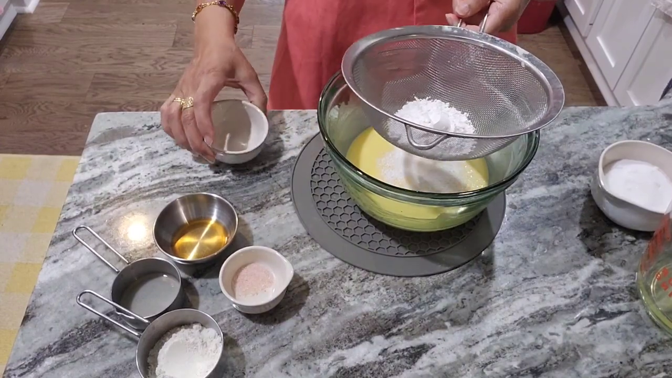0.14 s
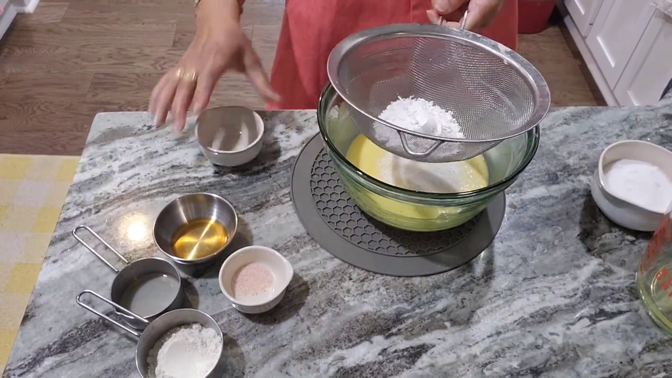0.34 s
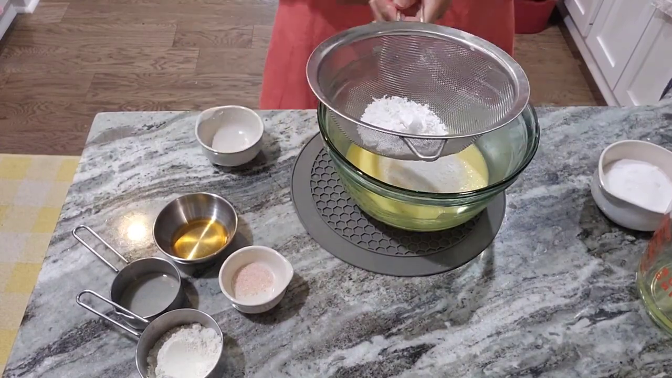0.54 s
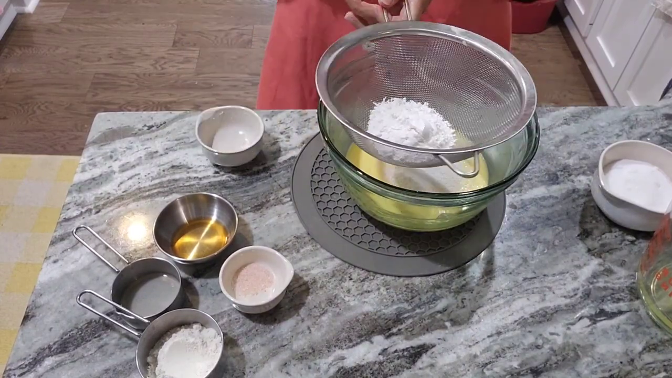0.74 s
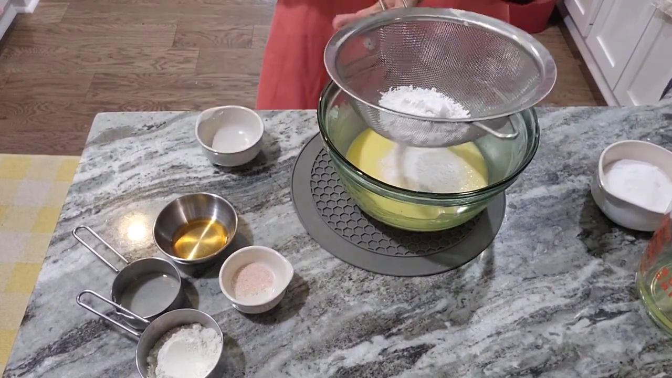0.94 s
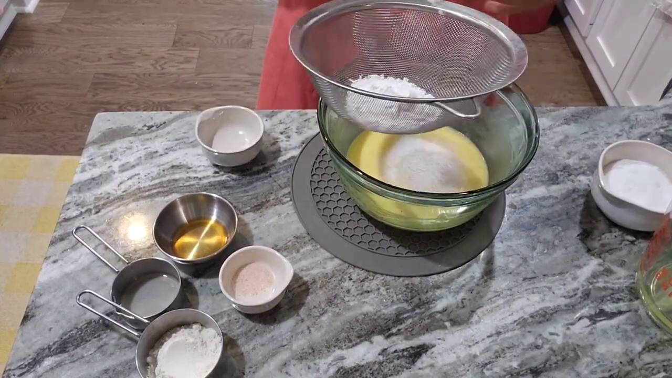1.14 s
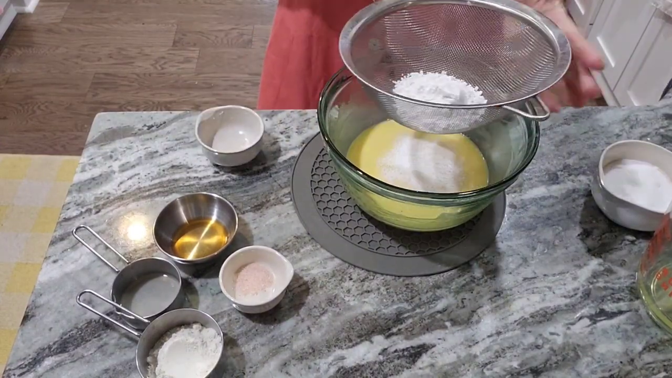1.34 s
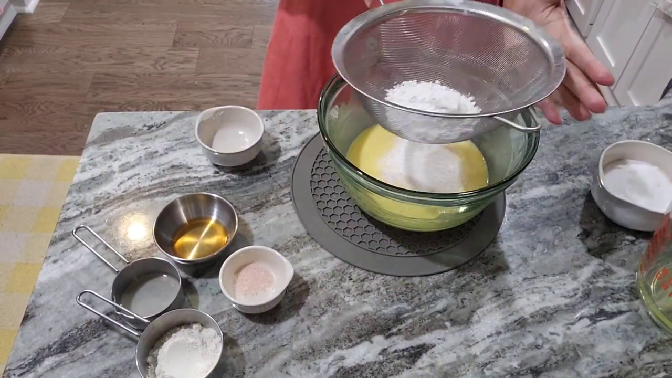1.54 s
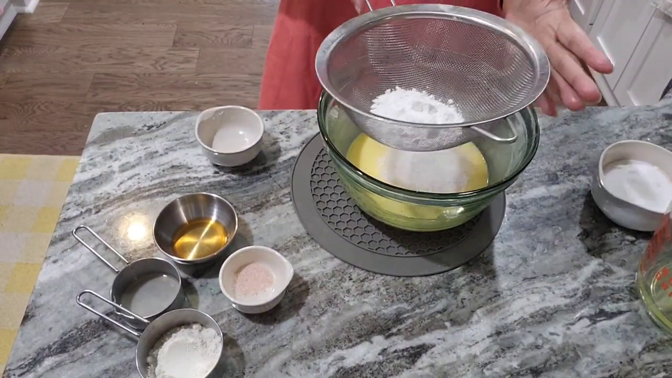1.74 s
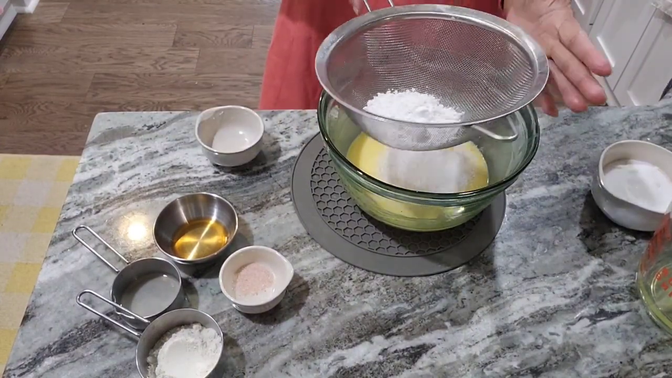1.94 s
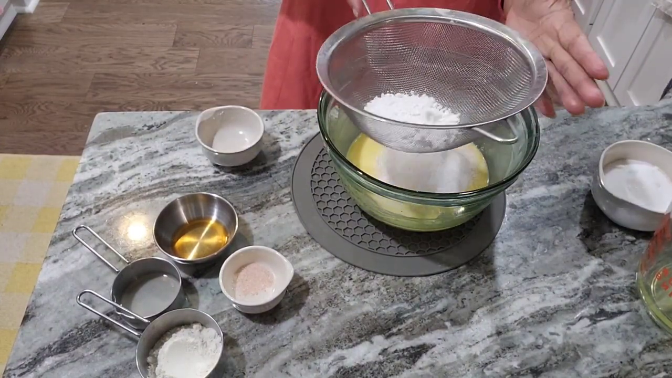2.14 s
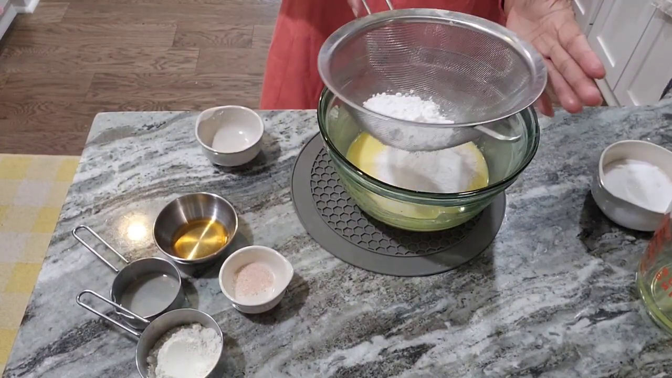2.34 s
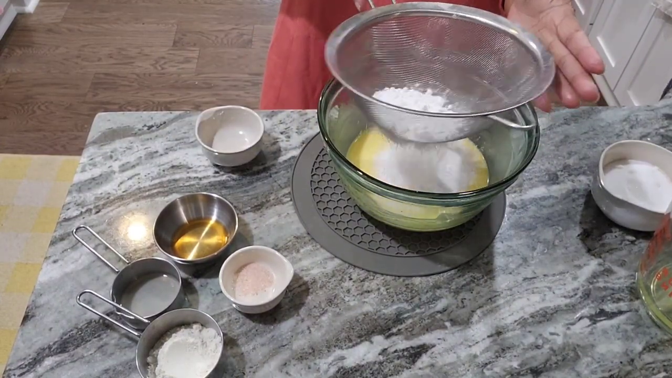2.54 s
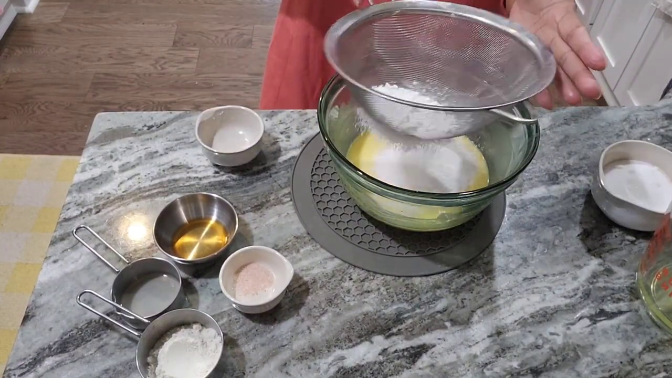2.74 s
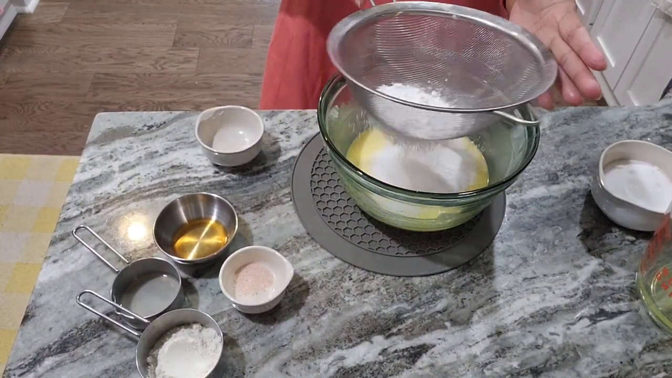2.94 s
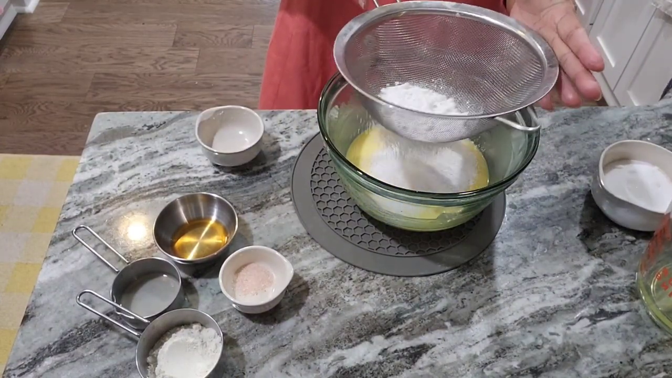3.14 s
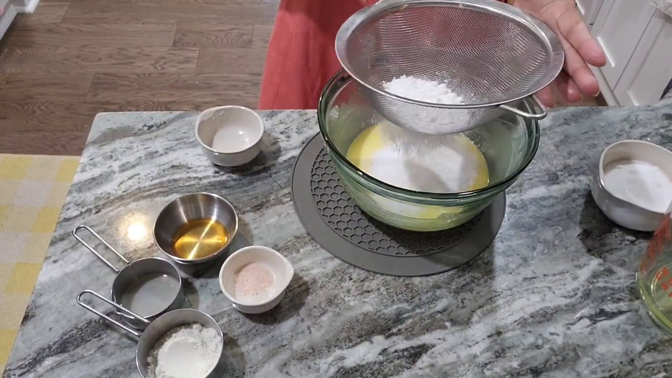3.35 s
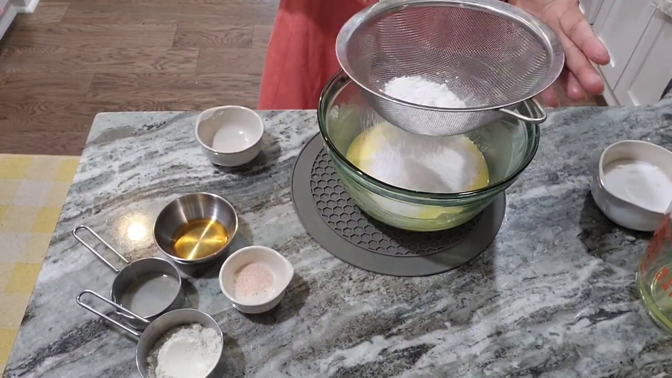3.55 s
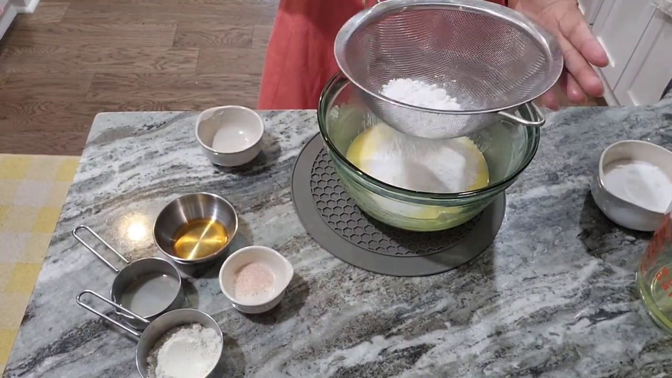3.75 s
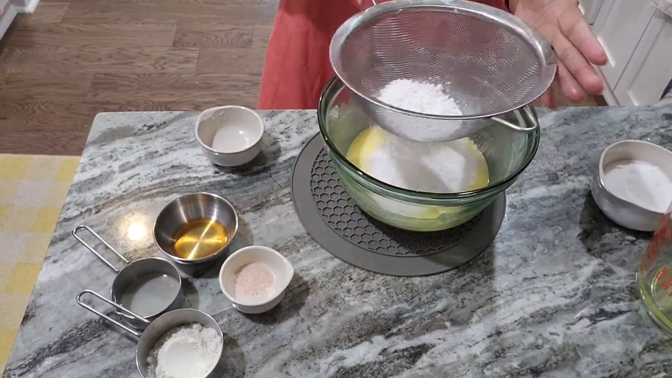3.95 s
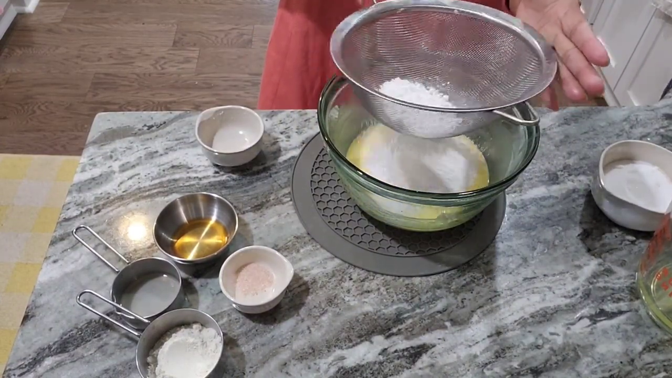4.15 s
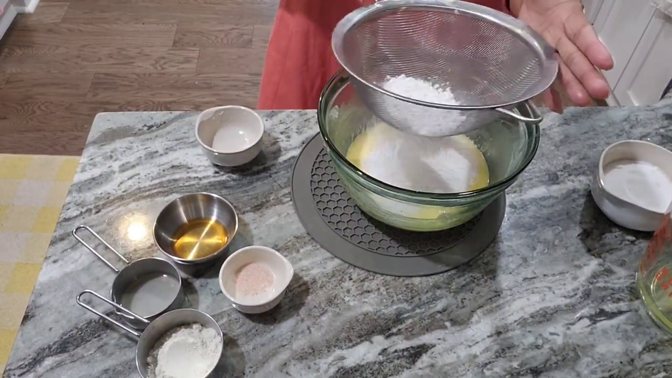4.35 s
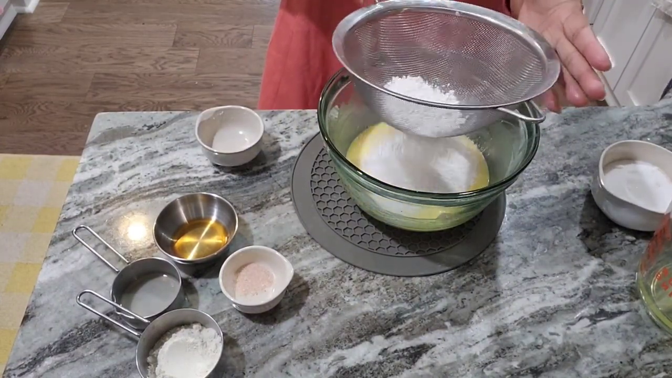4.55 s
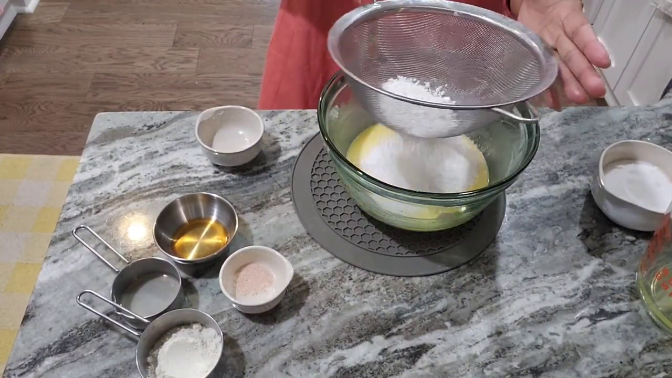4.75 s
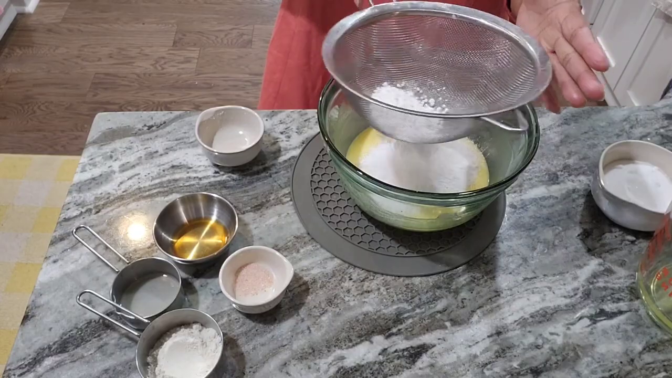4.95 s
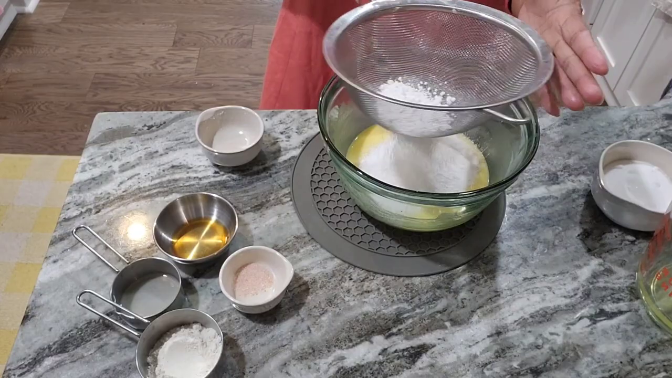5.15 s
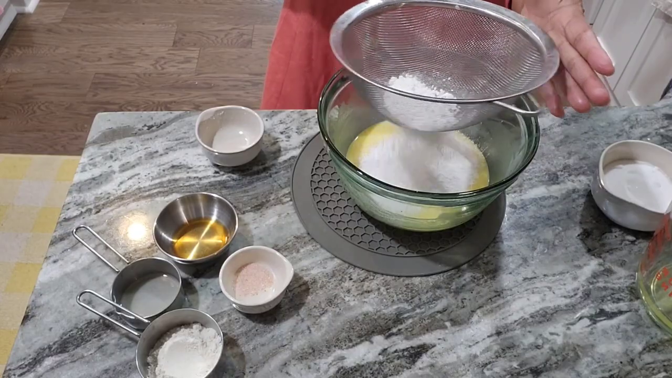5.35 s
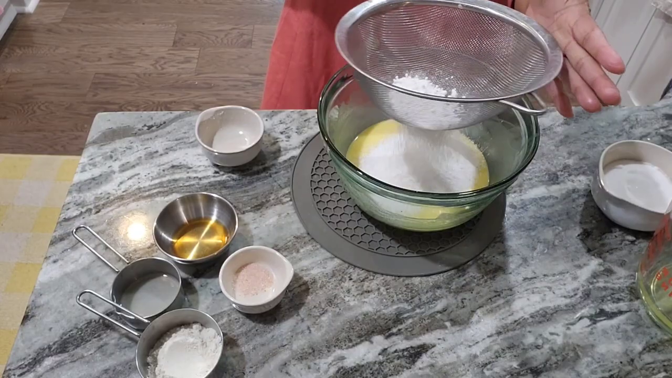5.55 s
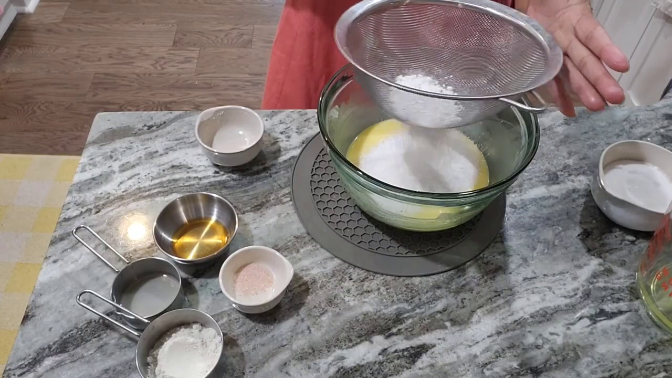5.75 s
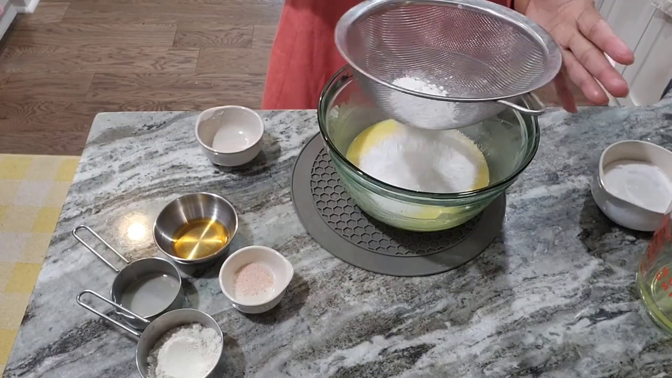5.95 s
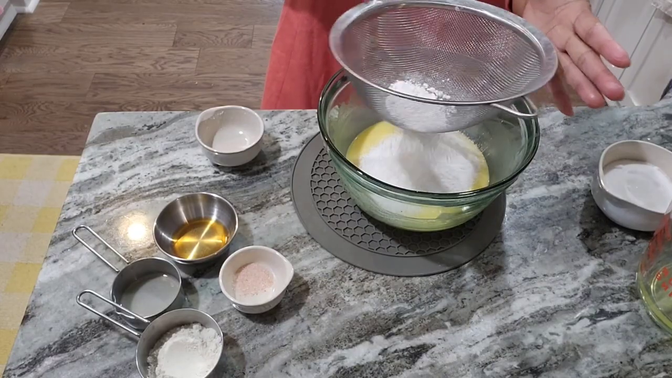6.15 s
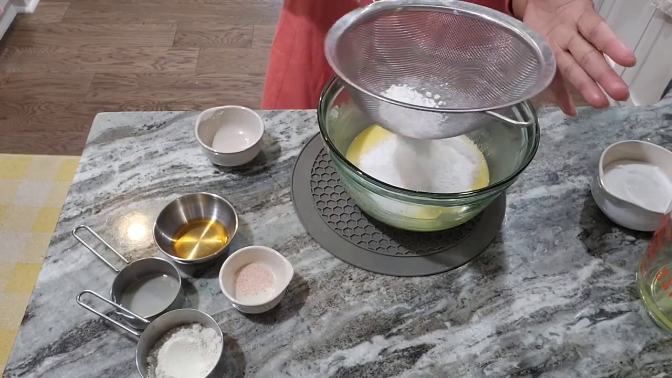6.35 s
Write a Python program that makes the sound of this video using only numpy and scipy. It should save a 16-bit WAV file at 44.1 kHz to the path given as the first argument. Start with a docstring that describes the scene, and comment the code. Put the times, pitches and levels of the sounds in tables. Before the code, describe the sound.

A small ceramic dish is set down on a stone counter close to the microphone, with one knock and then a quick ringing rattle. Afterwards, slightly to the right, flour hisses very faintly through a wire sieve patted about five times a second, with a few tiny ticks of the mesh. An appliance hums low throughout, and a barely audible high chirr recurs across the kitchen.

```python
"""A small ceramic dish is put down on a stone kitchen counter, close to a stereo microphone:
one held knock, then it is let go, rattles and rings. Just to the right, flour hisses faintly through
a wire sieve patted about five times a second, and the mesh ticks. An appliance hums low throughout,
a faint high chirr comes from across the room, and the kitchen rings for about half a second."""
import sys
import numpy as np
from scipy import signal
from scipy.fft import rfft, irfft
from scipy.io import wavfile

SR = 44100
rng = np.random.default_rng(int(sys.argv[2]) if len(sys.argv) > 2 else 0)


def store_wav(level_fs):
    """Save 16-bit WAV to argv[1]."""
    pcm = np.round(np.clip(np.atleast_2d(level_fs), -1, 1) * 32767)
    wavfile.write(sys.argv[1], SR, pcm.T.astype(np.int16))


N = 282240
TIME = np.arange(N) / SR
FREQ = np.maximum(np.fft.rfftfreq(N, 1 / SR), 1)


def undb(db):
    """Decibels to gain."""
    return 10 ** (np.asarray(db) / 20)


def along(table, hz=FREQ):
    """Read (f/Hz, value) points on a log-frequency axis."""
    f, value = np.transpose(table)
    return np.interp(np.log(hz), np.log(f), value)


def unit(x):
    """Scale to rms 1."""
    return x / np.sqrt(np.mean(x ** 2))


def colour(x, table):
    """Filter by a spectrum of (f/Hz, level/dB) points."""
    return irfft(rfft(x) * undb(along(table)), N)


def walk(rate):
    """Smooth random drift of rms 1 that changes about rate times a second."""
    return unit(irfft(rfft(rng.standard_normal(N)) * np.exp(-(FREQ / rate) ** 2), N))


def causal(gain):
    """Spectrum of the most compact causal response with this gain per frequency."""
    cepstrum = irfft(np.log(gain + 1e-9), N)
    cepstrum[1:N // 2] *= 2
    cepstrum[N // 2 + 1:] = 0
    return np.exp(rfft(cepstrum))


def at_microphone(x, lag_ms):
    """Two microphone ports: the right hears x lag_ms later, or earlier if negative."""
    return np.array([x, irfft(rfft(x) * np.exp(-2j * np.pi * FREQ * lag_ms / 1000), N)])


# likeness of the room sound at the two ports: f/Hz, correlation
PORT_LIKENESS = [(60, 0.98), (150, 0.85), (350, 0.674), (700, 0.073), (1500, 0), (4000, 0.027)]
def diffuse_noise():
    """Noise from all sides: alike at both ports in the bass, unrelated in the treble."""
    likeness = along(PORT_LIKENESS)
    mid, side = rfft(rng.standard_normal((2, N))) * np.sqrt([(1 + likeness) / 2, (1 - likeness) / 2])
    return irfft([mid + side, mid - side], N)


# appliance hum in the room, with a trace of fan whine: f/Hz, level/dB
HUM_LINES = [(63.5, -57.5), (73, -65.5), (114.8, -56), (155.3, -57), (198.8, -61.5), (223, -67.5),
             (341, -79), (443, -78.5), (613, -77), (705, -79)]
# the hum sinks and swells a little: t/s, level/dB
HUM_SWELL = [(0.9, -2), (1.7, 1), (2.4, 1), (2.55, -4), (2.75, 1), (4.25, -1), (4.85, 2.5), (5.25, -.5),
             (6.35, -.5)]
# kitchen air all around the microphone: f/Hz, level/dB
AIR_SPECTRUM = [(20, -21), (35, -13), (58, 2.5), (90, -1.5), (128, 3.5), (180, -5), (250, -14),
                (450, -19.5), (680, -20.5), (1000, -28), (1500, -42.5), (2300, -49.5), (4500, -55.5),
                (13000, -54)]
def appliance(air_db=-48.5, waver_db=2, wander_rad=1.0):
    """Low hum lines that waver in level and phase, over a rush of air."""
    hum = 0
    for hz, db in HUM_LINES:
        amplitude = np.sqrt(2) * undb(db + waver_db * walk(6))
        hum = hum + amplitude * np.sin(2 * np.pi * hz * TIME + wander_rad * walk(4))
    air = unit(colour(diffuse_noise(), AIR_SPECTRUM))
    rumble = signal.sosfiltfilt(signal.butter(2, 250, fs=SR, output="sos"), air)
    rush = undb(air_db + 1.6 * walk(9.93)) * (air - rumble)
    swell = undb(np.interp(TIME, *np.transpose(HUM_SWELL)))
    return swell * (hum + undb(air_db) * rumble) + rush


# reverberation of the kitchen: f/Hz, t60/s
KITCHEN_DECAY = [(150, 0.19), (500, 0.5155), (1500, .52), (3000, 0.44), (6000, 0.5015), (14000, 0.35)]
def kitchen(x, onset_s=0.0012):
    """Dense reflections that build within a few milliseconds and die band by band."""
    noise, response = rfft(diffuse_noise()), 0
    centres = np.geomspace(100, 14000, 8)
    for hz, share in zip(centres, np.eye(len(centres))):
        band = irfft(noise * np.interp(np.log(FREQ), np.log(centres), share), N)[:, :SR]
        response = response + band * np.exp(-np.log(1000) * TIME[:SR] / along(KITCHEN_DECAY, hz))
    response = response * np.clip(TIME[:SR] / onset_s - 1, 0, 1)
    response /= np.sqrt(np.sum(response ** 2) / 2)
    return signal.fftconvolve(x[None], response, axes=1)[:, :N]


def ring(modes, blows, attack_s=0.00019):
    """Decaying partials; every (t/s, level/dB) blow adds its energy to what still rings."""
    out, t = np.zeros(N), TIME[:SR * 3 // 2]
    for hz, db, t60 in modes:
        energy = 0
        for s, blow_db in blows:
            age = np.maximum(t - s, 0)
            envelope = (1 - np.exp(-age / attack_s)) * np.exp(-np.log(1000) * age / t60)
            energy = energy + (undb(db + blow_db) * envelope) ** 2
        out[:len(t)] += np.sqrt(energy) * np.sin(2 * np.pi * hz * t)
    return out


# dish meets counter: t/s, knock level/dB, hardness f/Hz, ring level/dB, thump level/dB
DISH_CONTACTS = [(0.2803, 0.5, 3823, -38, -35.5), (0.4412, -8.5, 7033, -28.5, -50),
                 (0.4432, 0.5, 6504, -22.5, -43), (0.4487, -2.5, 6000, -32, -51),
                 (0.4858, 2.5, 8500, -31, -45.5), (0.5001, -4, 8050, -29.5, -38),
                 (0.5078, -18, 4575, -35.5, -47)]
# the short knock of ceramic on stone: f/Hz, level/dB
KNOCK_SPECTRUM = [(60, -14), (200, -1), (400, -4), (750, -7.5), (1150, -4.5), (1500, -1.5), (1850, 0.5),
                  (2300, -2), (3000, -5), (3700, -2.5), (4500, -12.5), (7800, -19.5), (9500, -35.5),
                  (13600, -20), (15500, -39.5)]
# ring of the dish: f/Hz, level/dB, t60/s
DISH_MODES = [(1838, -10.5, 0.46), (1960, -14.5, 0.22), (2591, -20, 0.39), (2800, -20, 0.17),
              (3320, -8, 0.42), (3475, 0, 0.38), (3862, -24, .3), (5260, -21.5, 0.32), (5695, -28, .2),
              (7160, -19.5, 0.12), (7920, -24.5, 0.16), (7900, -20.5, .14), (13742, -15, 0.23)]
# low boom and mid ring of the room and counter after each contact: f/Hz, level/dB, t60/s
THUMP_RESONANCES = [(101.95, -1.5, .28), (142.3, -0.5, 0.078), (203.6, 3.5, 0.14), (505.9, -12, .35),
                    (569.4, -6.5, 0.29), (1450, -9, 0.12), (1546, -6.5, 0.354), (1722, -6, 0.41),
                    (1970, -1, 0.32), (1994, -8, .42), (2132, -8, 0.52)]
# first reflections off mixing bowl and cupboards: delay/ms, level/dB, right port lag/ms
REFLECTIONS = [(1.1, -6, .3), (3.1, -10.5, -0.19), (7.3, -12.5, 0.044), (11.6, -12, -.05),
               (19.2, -14.5, 0.085)]
def dish(spread_s=0.00066, knock_db=-2, ring_db=-3.5, thump_room_db=-11.5):
    """Close by, each contact gives a dry knock, a ceramic ring and a thump of room and counter."""
    # bending waves in the slab: high notes outrun low ones, so the knock is a short downward chirp
    dispersion = np.exp(-4j * np.pi * spread_s * np.sqrt(2000 * FREQ))
    knocks = np.zeros(N)
    for s, db, hardness_hz, _, _ in DISH_CONTACTS:
        start = int(s * SR)
        softness = 1 / np.sqrt(1 + (FREQ / hardness_hz) ** 4)
        knock = irfft(causal(undb(along(KNOCK_SPECTRUM)) * softness) * dispersion, N)[:SR]
        knocks[start:start + SR] += undb(db) * knock / np.linalg.norm(knock)
    ceramic = undb(ring_db) * ring(DISH_MODES, [(s, db) for s, _, _, db, _ in DISH_CONTACTS])
    thump = ring(THUMP_RESONANCES, [(s, db) for s, _, _, _, db in DISH_CONTACTS])
    direct = undb(knock_db) * at_microphone(knocks, lag_ms=0.16)
    direct += at_microphone(ceramic + thump, lag_ms=0.11)
    early = sum(undb(db) * at_microphone(np.roll(knocks, int(ms * SR / 1000)), lag)
                for ms, db, lag in REFLECTIONS)
    return direct + early + kitchen(knocks + ceramic + undb(thump_room_db) * thump)


# pats on the sieve, each at the height of its spill: t/s, level/dB
SIEVE_PATS = [(0.905, -75.5), (1.033, -84), (1.225, -86), (1.62, -76.5), (1.834, -84.5), (1.995, -74),
              (2.21, -73), (2.39, -76.5), (2.59, -72.5), (2.77, -73.5), (2.965, -72.5), (3.175, -75.5),
              (3.33, -72.5), (3.525, -72.5), (3.709, -72), (3.92, -73), (4.11, -75), (4.3, -73.5),
              (4.505, -73.5), (4.69, -73.5), (4.865, -73.5), (5.055, -75.5), (5.275, -73.5), (5.465, -74.5),
              (5.68, -79), (5.875, -73), (6.085, -76.5), (6.28, -78)]
# how long a spill lasts as the patting goes on: t/s, length/s
SPILL_LENGTHS = [(0.9, 0.053), (2.0, 0.026), (2.55, 0.033), (2.9, 0.058), (4.6, 0.055), (6.3, 0.037)]
# flour on wire mesh, straight to the microphone: f/Hz, level/dB
FLOUR_DIRECT = [(1500, -24), (4000, -17.5), (6000, -8), (7300, -3.5), (8600, 1), (9800, -9.5), (11300, 2),
                (12700, 1.5), (14300, -8), (15500, -2)]
# the same hiss off the bowl and counter: f/Hz, level/dB
FLOUR_SCATTERED = [(1500, 2), (3000, -15), (4500, -4.5), (5700, -5), (6700, 4.5), (8000, -6), (10000, -1.5),
                   (13700, 5.5), (15500, -11)]
def sieve(direct_db=-0.46, room_db=-3, pan_db=-11.5, trickle_db=-90.0, grain_db=4, clump_db=2):
    """Held to the right; each pat slides flour over the mesh in a swell of tiny grains."""
    # a thin trickle starts by itself and runs on between the pats
    flow = undb(trickle_db) * np.clip((TIME - 0.32) / 0.15, 0, 1)
    for s, db in SIEVE_PATS:
        length = np.interp(s, *np.transpose(SPILL_LENGTHS))
        flow = flow + undb(db) * 2. ** (-2 * ((TIME - s) / length) ** 2)
    noise = rng.standard_normal(N)
    graininess = np.repeat(rng.standard_normal(N // 16 + 1), 16)[:N]
    grains = noise * undb(grain_db * graininess + clump_db * walk(60))
    hiss = at_microphone(unit(colour(grains, FLOUR_DIRECT)), lag_ms=-0.042)
    direct = flow * hiss * undb([[pan_db / 2], [-pan_db / 2]])
    scattered = kitchen(flow * unit(colour(grains, FLOUR_SCATTERED)))
    return undb(direct_db) * direct + undb(room_db) * scattered


# tiny ticks of the mesh, right of the microphone: t/s, level/dB
MESH_TICKS = [(1.568, -65), (1.9886, -69), (5.0601, -71), (5.8785, -58)]
def mesh_ticks(decay_s=0.0027, pan_db=-4, room_db=-3):
    """Wires slip against each other: very short, very bright bursts."""
    bursts = sum(undb(db) * (TIME >= s) * np.exp(-np.abs(TIME - s) / decay_s) for s, db in MESH_TICKS)
    ticks = bursts * unit(colour(rng.standard_normal(N), [(3000, -30), (9000, -12), (14500, 10)]))
    return ticks * undb([[pan_db], [-pan_db]]) + undb(room_db) * kitchen(ticks)


# a faint high chirr, about once a second: t/s, centre f/Hz, level/dB
FAR_CHIRRS = [(1.85, 6360, -84), (2.83, 6840, -81), (3.84, 5940, -82), (4.83, 6600, -78.5),
              (5.83, 7150, -85)]
def chirr(length_s=0.039, width_hz=550, pan_db=2):
    """Soft narrow swells of hiss from across the room, a little to the left."""
    out = 0
    for s, hz, db in FAR_CHIRRS:
        passband = np.exp(-((FREQ - hz) / width_hz) ** 2 / 2)
        hiss = unit(irfft(rfft(rng.standard_normal((2, N))) * passband, N))
        out = out + undb(db) * hiss * np.exp(-((TIME - s) / length_s) ** 2 / 2)
    return out * undb([[pan_db], [-pan_db]])


def scene():
    """Dish, sieve and the sounds of the room, heard from beside the counter."""
    return dish() + sieve() + mesh_ticks() + chirr() + appliance()


def record(dry, low_hz=38, top_hz=15650):
    """The microphone drops the deepest bass and the recorder cuts the top."""
    x = signal.sosfilt(signal.butter(3, low_hz, "highpass", fs=SR, output="sos"), dry)
    return signal.sosfilt(signal.ellip(12, .1, 80, top_hz, fs=SR, output="sos"), x)


dry = scene()
out = record(dry)
store_wav(out)
```